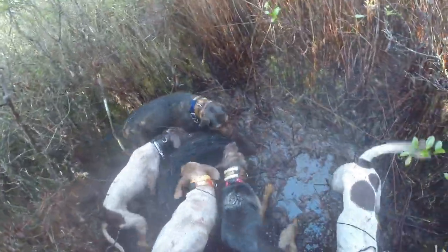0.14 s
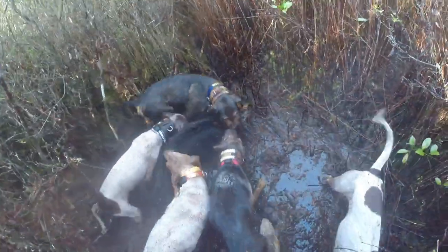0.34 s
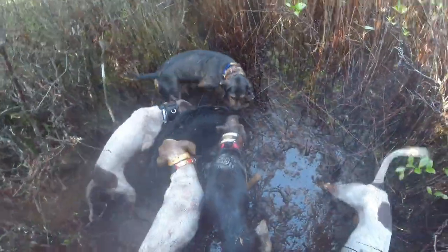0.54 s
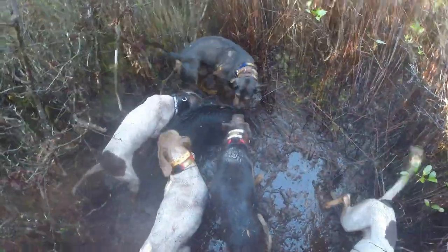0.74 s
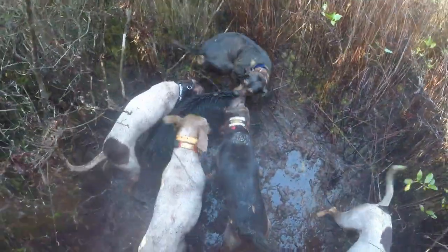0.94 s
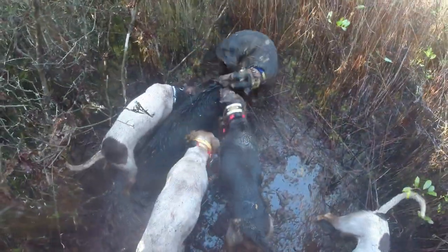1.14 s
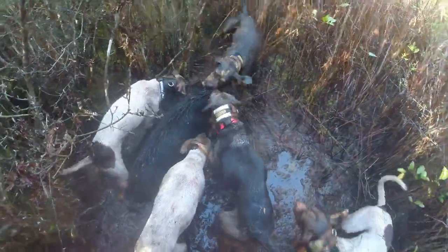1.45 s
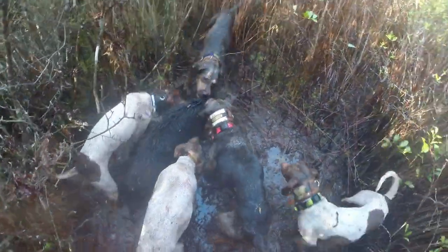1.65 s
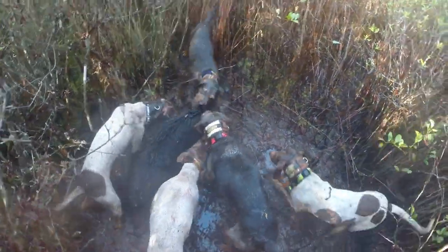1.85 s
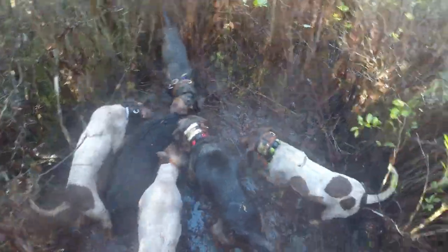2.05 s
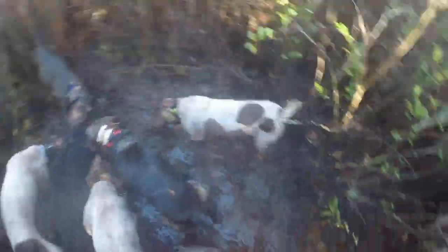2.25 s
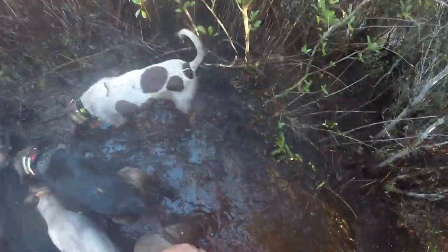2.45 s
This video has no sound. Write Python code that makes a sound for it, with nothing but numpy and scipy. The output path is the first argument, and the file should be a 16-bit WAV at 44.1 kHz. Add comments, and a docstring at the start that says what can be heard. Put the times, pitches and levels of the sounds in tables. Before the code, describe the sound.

A wild hog squeals, shrill and rasping, after a few faint grunts and a brief growl. Around it, dogs' paws splash lightly in swamp mud and marsh grass rustles, with low wind on the microphone.

```python
"""A wild hog, held by dogs in a swamp, gives a short hoarse cry, then a growl that rises into a squeal.
The squeal is a high whistle plus a lower buzz that jumps between about a quarter and a third of its pitch.
The growl is a rattle of knocks from the vocal folds; the cries and grunts are breath in the throat.
Sedge rustles and mud splashes under the animals. Behind them the swamp gives a soft hush,
and wind rumbles on the hand-held microphone."""
import sys
import numpy as np
from scipy import signal
from scipy.fft import rfft, irfft
from scipy.io import wavfile
from scipy.ndimage import map_coordinates

SR = 44100
rng = np.random.default_rng(int(sys.argv[2]) if len(sys.argv) > 2 else 0)


def unload_wav(signal):
    """Save mono or channel-first audio to the path in sys.argv[1] as 16-bit WAV at rate SR, clipped to [-1, 1]."""
    wavfile.write(
        sys.argv[1],
        SR,
        np.round(np.clip(np.atleast_2d(signal).T, -1, 1) * 32767).astype(np.int16),
    )


N = 114660
T = np.arange(N) / SR

# Levels in the tables are relative: each compares with the others in its table. the squeal's whistle; before
# 2.0 s its faint low tone follows the growl's second resonance (t/s, f/Hz, level/dB, level of its octave/dB)
WHISTLE = [(1.78,1015,-51,-81),(1.93,1077,-67.5,-100),(2.04,1180,-50,-67),(2.062,1250,-62,-38),(2.08,1351,-37.5,-33),(2.102,1495,-53,-37.5),(2.15,1519,-42.5,-43.5),(2.185,1519,-41,-38.5),(2.205,1628,-31.5,-44),(2.225,1652,-30.5,-58),(2.27,1707,-24.5,-64),(2.297,1669,-26.5,-56),(2.33,1699,-23.5,-40),(2.38,1670,-32.5,-44),(2.425,1664,-27,-49),(2.46,1600,-33.5,-35),(2.478,1513,-31,-41.5),(2.496,1245,-44.5,-40),(2.52,991,-60,-79)]
# force behind the squeal's harsh part (t/s, level/dB, roughness from 0 = smooth to 1 = full)
EFFORT = [(1.78,-40,0.31),(1.95,-45,0.85),(2.0,-40,0.82),(2.045,-8,0.79),(2.085,-8,0.77),(2.135,1.5,0.16),(2.185,1.5,0.3),(2.225,2,0.29),(2.285,2,0.28),(2.34,3.5,0.25),(2.40,0.5,0.44),(2.435,1,0.68),(2.472,1.5,0.52),(2.493,1,0.52),(2.515,-36,1.14)]
# when the buzz locks to the whistle (start t/s, length/s, boost of the tone above the whistle/dB)
LOCKS = [(2.205,0.034,2),(2.271,0.024,18),(2.326,0.029,9.5),(2.378,0.04486,6.5),(2.446,0.056,0.5)]
# tones that the buzz adds around each whistle harmonic (steps of the buzz pitch, level/dB)
SIDE_TONES = [(-1,-5.5),(1,1.5),(2,-2.5)]
# how the throat and open mouth shape the squeal (f/Hz, level/dB)
THROAT = [(200,-30),(420,-11.5),(580,-14.5),(840,-2.5),(1200,1.5),(1520,-9),(1900,0.5),(2105,-3),(2260,7),(2400,0.5),(2525,9.5),(2760,-10),(3400,-7.5),(3820,-3.5),(4210,-11),(4500,-17.5),(5050,-15),(6100,-17),(6740,-12.5),(7200,-17),(7800,-14.5),(8600,-28.5),(10400,-24.5),(13000,-33.5),(15000,-43)]
# the closing mouth lowers the throat's resonances (t/s, frequency ratio)
MOUTH = [(2.44,0.95),(2.465,0.96),(2.495,.8)]
# boost or cut of the squeal's treble (t/s, level/dB)
TREBLE = [(2.03,-9.5),(2.11,3),(2.2,-2),(2.3,-2),(2.4,-0.5),(2.47,0.5)]
# the growl's knocks of the vocal folds (t/s, level/dB, brightness/dB)
KNOCKS = [(1.619,-32,-10),(1.64,-33,-1),(1.66,-37,-2.5),(1.766,-34.5,-3),(1.783,-35,3.5),(1.798,-36,-11),(1.814,-34.5,2),(1.833,-34.5,-14),(1.855,-33.5,6.5),(1.867,-37.5,-12),(1.885,-35.5,-13),(1.911,-37,-2),(1.928,-36,-1.5),(1.944,-39,-5),(1.973,-36,-6),(1.986,-34,-12),(1.998,-33,-2),(2.013,-27,-13),(2.024,-32,4)]
# the growl's two lowest resonances, moved by the jaw (t/s, first f/Hz, second f/Hz)
JAW = [(1.65,905,1063),(1.73,620,1035),(1.86,580,1010),(1.96,660,1084),(2.03,784,1190)]
# upper resonances of the half-closed mouth (f/Hz, width/Hz, level/dB)
GROWL_RESONANCES = [(1777,118,1.5),(2314,160,-2.5),(2635,230,-5),(3180,150,-21)]
# hoarse cries (peak t/s, spread in time/s, level/dB)
CRIES = [(0.427,0.0087,-49.5),(0.547,0.009,-41.5),(0.609,0.0082,-55),(1.335,0.0051,-44.5)]
# the throat's resonances in a cry (f/Hz, base width/Hz, level/dB)
CRY_RESONANCES = [(1150,150,4),(2220,440,6.5),(2600,300,-35),(3780,240,-1.5)]
# low grunts (peak t/s, spread in time/s, level/dB, resonance f/Hz)
GRUNTS = [(0.417,0.01,-53,980),(0.609,0.0098,-51.5,880),(0.648,0.018,-54.5,740),(0.99,0.0086,-52,534),(1.02,0.004,-53.5,744),(1.747,0.0064,-47,198)]
# paws splashing in the mud (peak t/s, level/dB, decay/s)
SPLASHES = [(0.017,-47,0.0086),(0.261,-50.5,0.031),(.366,-52.5,0.024),(0.394,-50,0.01),(.436,-52.5,0.0064),(0.55,-49.5,0.012),(1.101,-50,0.031),(1.344,-54.5,0.045),(1.466,-53.5,0.022),(1.599,-51.5,0.024)]
# tone of the mud (f/Hz, level/dB)
SPLASH_TONE = [(300,-8),(1200,-2.5),(2300,6),(3800,0.5),(5200,-1.5),(7500,-3),(9000,-10.5),(13000,-13),(15000,-31)]
# loudness of the rustling sedge (t/s, level/dB)
RUSTLE = [(0,-52.5),(.3,-55.5),(.45,-56),(.72,-60.5),(.9,-56),(1.08,-54.5),(1.26,-61),(1.38,-55.5),(1.75,-57.5),(2.0,-54.5)]
# tone of the rustling hiss, with its ringing peaks (f/Hz, level/dB)
RUSTLE_TONE = [(400,2),(850,-15),(1160,1.5),(1480,-15.5),(1900,1),(2300,2.5),(3050,-13),(3800,0.5),(4350,-14),(4950,-4),(5600,-13),(6250,-9),(7400,-17),(8700,-24.5),(10200,-18.5),(12500,-37.5),(15000,-31)]
# strength of the wind (t/s, level/dB)
WIND = [(0,-43),(.95,-40.5),(1.07,-39.5),(2.2,-36.5),(2.28,-31.5),(2.37,-40)]
# tone of the wind (f/Hz, level/dB)
WIND_TONE = [(8,-5),(18,-1.5),(28,4),(36,-4),(48,-15),(62,-16.5),(85,-27),(200,-31.5),(500,-72)]
# tone of the swamp's hush (f/Hz, level/dB)
SWAMP_TONE = [(70,1.5),(130,-13),(220,0),(330,-7.5),(600,-6.5),(1000,-8.5),(2500,-12),(5000,-29.5),(9000,-28),(15000,-33)]


def squeal(shimmer_db=5.5, treble_hz=4060):
    """The hog whistles; overtones, a buzz and rasping breath pass its throat and make the sound harsh."""
    hz = curve(WHISTLE) * (1 + 0.003 * wobble(38.6))
    rough = np.clip(curve(EFFORT, column=2), 0, 1)
    mouth = curve(MOUTH)
    phase = phase_of(hz * (1 + 0.015 * rough * wobble(206)))
    whistle = overtones = 0
    for k in (1, 2):
        db = curve(WHISTLE, column=k + 1) + shimmer_db / 2 * rough * wobble(57)
        whistle += np.sqrt(2) * gain(db) * np.sin(k * phase)
    for k in range(3, 7):
        db = -35 + shimmer_db * rough * wobble(60)
        overtones += gain(db) * gain_at(THROAT, k * hz / mouth) * np.sin(k * phase)
    tones, locked_phase = buzz(hz, phase, rough, mouth, shimmer_db)
    harsh = gain(curve(EFFORT)) * (overtones + tones + rasp(locked_phase, rough, mouth, treble_hz))
    top = signal.sosfiltfilt(signal.butter(4, treble_hz, "high", fs=SR, output="sos"), harsh)
    sounding = (T > EFFORT[0][0]) & (T < EFFORT[-1][0])
    return sounding * (whistle + harsh + (gain(curve(TREBLE)) - 1) * top)


def buzz(whistle_hz, whistle_phase, rough, mouth, shimmer_db, free_hz=415.1, jump_s=0.008):
    """A buzz, free or locked to a third of the whistle's pitch, mixes with it and makes new tones."""
    locked = boost_db = tones = 0
    for start, length, db in LOCKS:
        middle = start + length / 2
        locked = np.maximum(locked, np.clip(.5 + (length / 2 - np.abs(T - middle)) / jump_s, 0, 1))
        boost_db += db * swell(middle, length / 3)
    for hz, share, is_locked in ((free_hz, 1 - locked, False), (whistle_hz / 3, locked, True)):
        buzz_phase = phase_of(hz * (1 + 0.01972 * wobble(30.8) + 0.109 * rough * wobble(139)))
        for harmonic in range(9):
            for step, side_db in SIDE_TONES:
                if (harmonic == 0 and step < 1) or (is_locked and step == 2):
                    continue
                db = -38.5 + side_db + shimmer_db * rough * wobble(69) + 3 * wobble(48)
                if is_locked and harmonic == step == 1:
                    db += boost_db
                phase = harmonic * whistle_phase + step * buzz_phase + rng.uniform(0, 2 * np.pi)
                phase += rough * wobble(134)
                throat = gain_at(THROAT, (harmonic * whistle_hz + step * hz) / mouth)
                tones += np.sqrt(share) * gain(db) * throat * np.sin(phase)
    # a faint tone an octave below the free buzz
    low_tone = gain(-55 + 2 * wobble(34)) * np.sin(phase_of(free_hz / 2 * (1 + 0.109 * wobble(67))))
    return tones + low_tone, buzz_phase


def rasp(buzz_phase, rough, mouth, pivot_hz, db_per_octave=2.5):
    """Breath hisses through the throat, pulsing with the buzz."""
    air = hiss([(hz, db + db_per_octave * np.log2(hz / pivot_hz)) for hz, db in THROAT])
    lowered = map_coordinates(air, [np.cumsum(mouth)], mode="mirror")  # slower sounds deeper
    return gain(-30.5) * rough * lowered * (1 + 0.48 * np.cos(buzz_phase))


def growl():
    """Slow, uneven knocks of the vocal folds, each with a puff of air, ring the half-closed mouth."""
    first_hz, second_hz = curve(JAW), curve(JAW, column=2)
    low = bright_knocks = 0
    for at, db, bright_db in KNOCKS:
        i = int(at * SR)
        knock = 0.032 * noise() * fade(at, decay_s=0.015)  # the puff
        knock[i] += 1  # the click of the folds
        low += gain(db) * ring(knock, first_hz[i], width_hz=245)
        low += gain(db - 0.5) * ring(knock, second_hz[i], width_hz=89)
        bright_knocks += gain(db + bright_db) * knock
    high = sum(gain(db) * ring(bright_knocks, hz, width) for hz, width, db in GROWL_RESONANCES)
    return gain(33) * (low + high)


def cries_and_grunts():
    """Short bursts of fluttering breath ring the throat: high for a cry, low for a grunt."""
    breath = noise() * gain(2.2 * wobble(200))
    hoarse = unit(sum(gain(db) * ring(breath, hz, width * 1.1) for hz, width, db in CRY_RESONANCES))
    out = hoarse * sum(gain(db) * swell(at, spread) for at, spread, db in CRIES)
    for at, spread, db, hz in GRUNTS:
        out += gain(db) * swell(at, spread) * unit(ring(breath, hz, width_hz=0.7 * hz))
    return out


def sedge():
    """Bodies push through the marsh grass, which hisses and snaps."""
    stems = noise() + gain(-7) * crackle(spread_db=11, per_second=2500)
    return unit(shape_tone(stems, RUSTLE_TONE)) * gain(curve(RUSTLE) + 1.5 * wobble(32))


def mud(rise_s=0.0037):
    """Paws press into the mud, which crackles and dies away."""
    press = sum(gain(db) * np.where(T < at, swell(at, rise_s), fade(at, decay))
                for at, db, decay in SPLASHES)
    return unit(shape_tone(crackle(spread_db=2.5, per_second=3600), SPLASH_TONE)) * press


def brush_echo(sound, length_s=0.14):
    """The bushes scatter the sound into a short, soft echo."""
    tail = noise() * gain(-60 * T / length_s) * (T > .004)
    return gain(-13.5) * signal.fftconvolve(sound, tail / np.sqrt(np.sum(tail ** 2)))[:N]


def wind():
    """Moving air rumbles on the microphone."""
    return gain(curve(WIND)) * hiss(WIND_TONE)


def swamp():
    """The swamp gives a quiet, steady hush."""
    return gain(-56.5) * hiss(SWAMP_TONE)


def gain(db):
    """Turn decibels into a multiplier."""
    return 10 ** (np.asarray(db) / 20)


def unit(x):
    """Scale to an average power of one."""
    return x / np.sqrt(np.mean(x ** 2))


def curve(table, column=1):
    """One column of a table, joined by straight lines in time."""
    rows = np.array(table)
    return np.interp(T, rows[:, 0], rows[:, column])


def phase_of(hz):
    """Add up a changing pitch into a wave's angle."""
    return 2 * np.pi * np.cumsum(hz) / SR


def gain_at(tone, hz):
    """How strongly a tone table passes these frequencies."""
    rows = np.array(tone)
    return gain(np.interp(np.log(np.maximum(hz, 1)), np.log(rows[:, 0]), rows[:, 1]))


def shape_tone(x, tone):
    """Filter a sound by a tone table."""
    return irfft(rfft(x) * gain_at(tone, np.fft.rfftfreq(N, 1 / SR)), N)


def noise():
    """White noise."""
    return rng.standard_normal(N)


def hiss(tone):
    """Noise shaped by a tone table."""
    return unit(shape_tone(noise(), tone))


def wobble(rate_hz):
    """A smooth random wiggle, about one in size."""
    return unit(signal.sosfilt(signal.butter(2, rate_hz, fs=SR, output="sos"), noise()))


def crackle(spread_db, per_second):
    """Tiny random snaps of unequal size."""
    snaps = np.sign(noise()) * (rng.random(N) < per_second / SR)
    return unit(snaps * gain(spread_db * np.minimum(rng.exponential(size=N), 3)))


def ring(x, hz, width_hz):
    """A resonance: filter twice to keep the sound near one frequency."""
    peak = signal.iirpeak(hz, hz / width_hz, fs=SR)
    return signal.lfilter(*peak, signal.lfilter(*peak, x))


def swell(at, spread_s):
    """A bell-shaped rise and fall."""
    return np.exp(-.5 * ((T - at) / spread_s) ** 2)


def fade(at, decay_s):
    """A sudden start that dies away."""
    return (T >= at) * np.exp(-np.abs(T - at) / decay_s)


def scene():
    """The hog and the scuffle, with their echo, over the swamp's hush and the wind."""
    animals = squeal() + growl() + cries_and_grunts() + sedge() + mud()
    return (animals + brush_echo(animals) + swamp() + wind())[None]


def record(dry, top_hz=15200):
    """Cut off the highest treble."""
    return signal.sosfilt(signal.ellip(10, .2, 80, top_hz, fs=SR, output="sos"), dry)


dry = scene()
out = record(dry)
unload_wav(out)
```